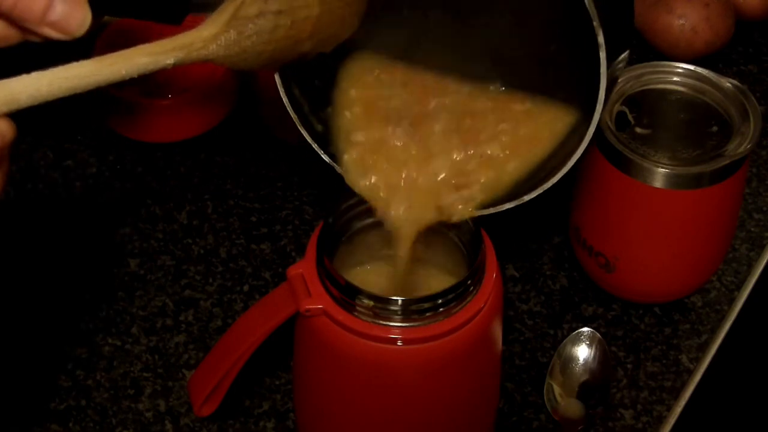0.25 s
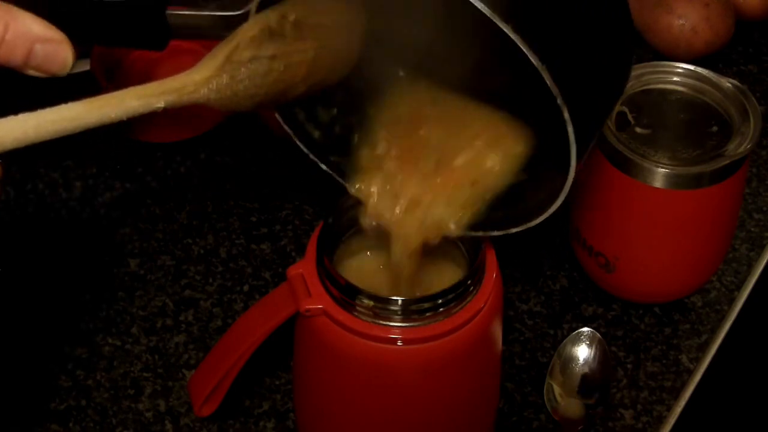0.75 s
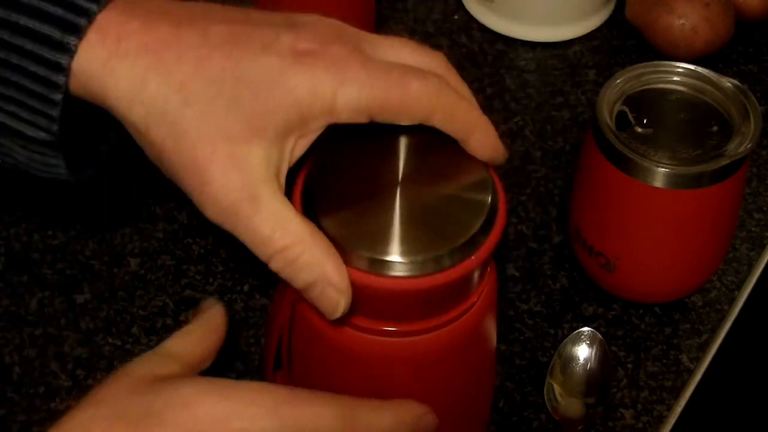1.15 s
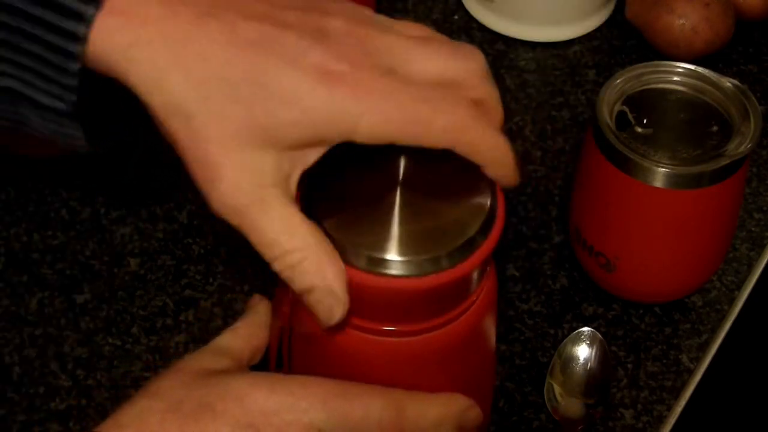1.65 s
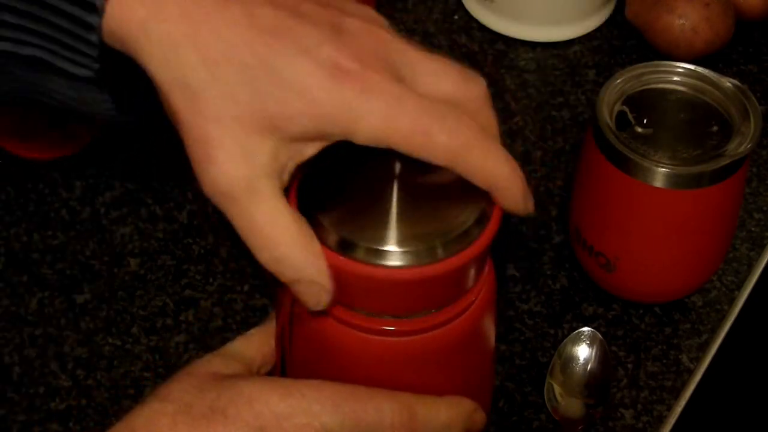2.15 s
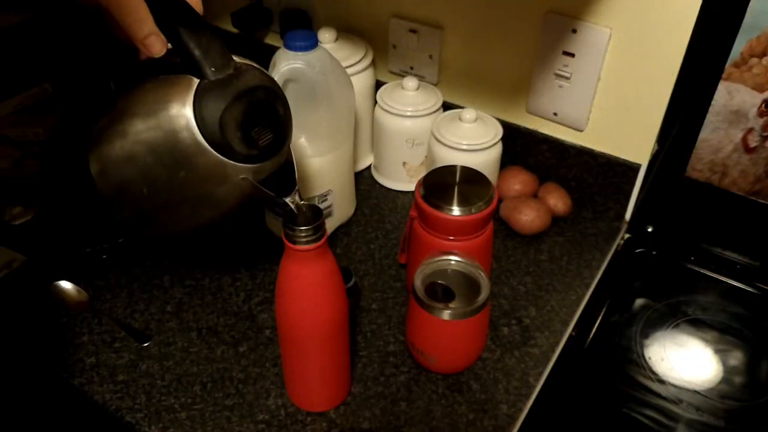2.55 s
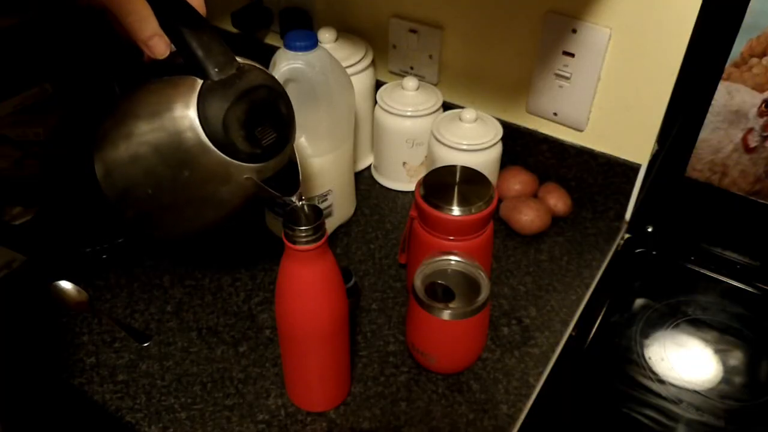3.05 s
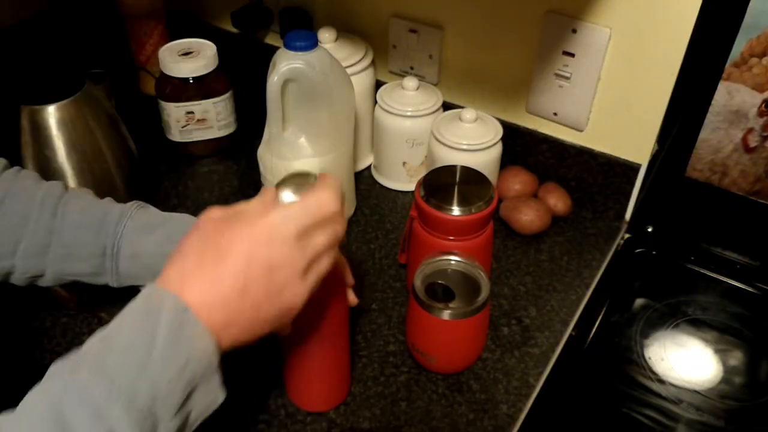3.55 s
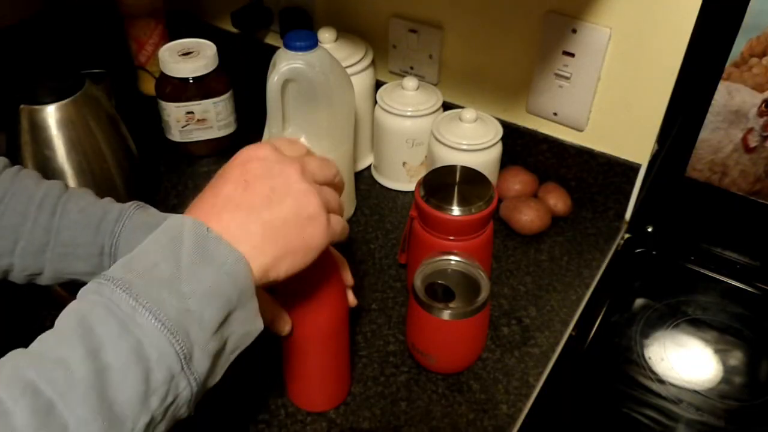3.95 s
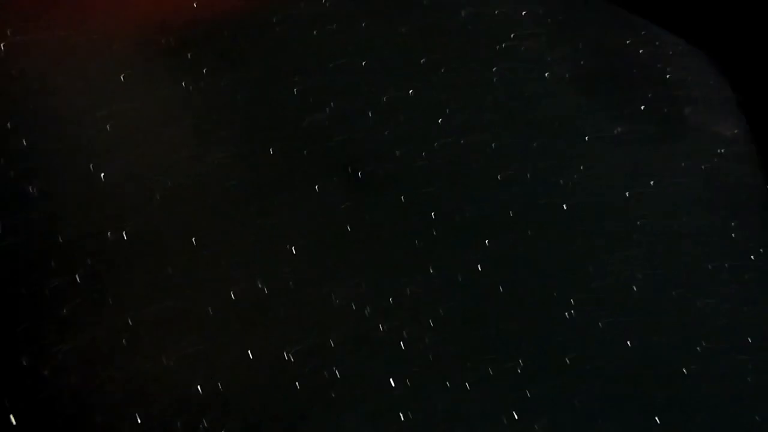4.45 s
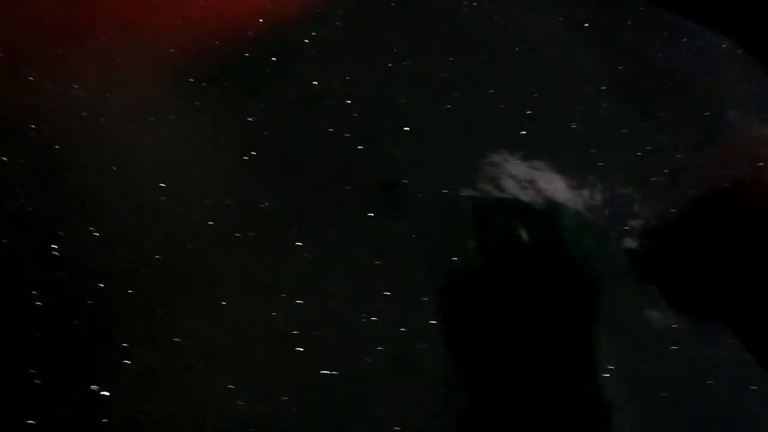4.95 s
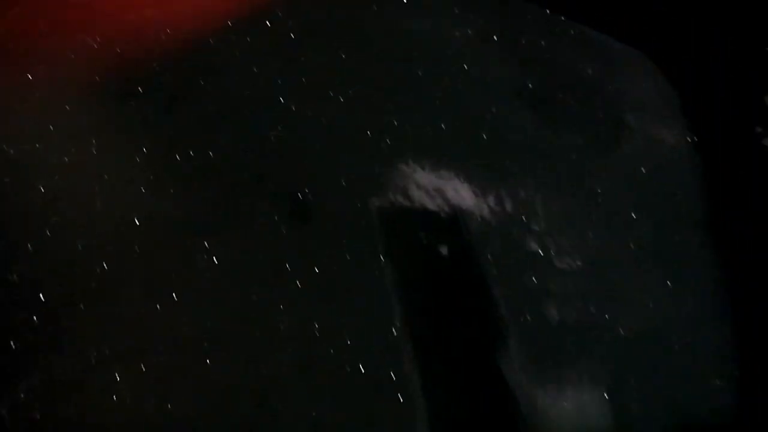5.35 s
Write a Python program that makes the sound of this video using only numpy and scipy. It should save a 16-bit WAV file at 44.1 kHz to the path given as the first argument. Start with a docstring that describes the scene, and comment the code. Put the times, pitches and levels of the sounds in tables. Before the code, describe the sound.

Soup plops softly, a steel flask lid knocks, water trickles and a cap clinks, then an ice scraper rasps a windscreen over an idling engine.

```python
"""A kitchen worktop, close to a stereo microphone. Soup plops into a steel food flask, whose lid is
knocked on and twisted; a kettle trickles into a steel bottle, whose cap clinks home. Each knock
rings the steel and the air inside. Then, abruptly, outdoors beside an idling car: a plastic scraper
lands on the windscreen and rasps the frost off in three strokes, ice crystals breaking under its
chattering blade."""
import sys
import numpy as np
from scipy import signal
from scipy.fft import rfft, irfft
from scipy.io import wavfile
from scipy.ndimage import uniform_filter1d

SR = 44100
rng = np.random.default_rng(int(sys.argv[2]) if len(sys.argv) > 2 else 0)


def unload_wav(signal):
    """Save mono or channel-first audio to the path in sys.argv[1] as 16-bit WAV at rate SR, clipped to [-1, 1]."""
    wavfile.write(
        sys.argv[1],
        SR,
        np.round(np.clip(np.atleast_2d(signal).T, -1, 1) * 32767).astype(np.int16),
    )


N = 247401
T = np.arange(N) / SR
LID_FROM, KETTLE_FROM, CAP_FROM, CAR_FROM = 1.033, 2.367, 3.352, 4.297  # seconds

# How alike the two sides of the microphone sound in each place: frequency_hz, correlation
INDOORS = [(130, 1), (640, .92), (1400, 0.85), (3100, 0.72), (6800, 0.38), (15000, 0.3)]
OUTDOORS = [(300, 0.99), (1400, 0.99), (3100, 0.98), (7000, 0.63), (15000, 0.25)]


def scraper(judder_db=0.72, grit_db=1.5, rasp_gain_db=3.0):
    """Countless ice crystals fracture under the blade while its edge catches and slips."""
    # Three strokes and a light graze (the second row), each a steady drag with one shove on top:
    # start_s, end_s, drag_db, shove_middle_s, shove_half_length_s, shove_db, fizz_from_db, fizz_to_db
    strokes = [(4.283, 4.818, -25, 4.52, 0.15, 6, -7, 2.5), (4.843, 4.915, -47, 4.898, 0.021, 8, -3, -9),
               (4.918, 5.247, -41, 5.124, .16, 21.5, 4.5, -3.5),
               (5.266, 5.605, -28, 5.355, 0.065, 9, -1, 7)]
    # Peaks and dips colouring each stroke; the first has a thin, high hiss near 11 kHz:
    # centre_hz, width_hz, lift_db
    colours = [
        [(2270, 430, -2), (2910, 85, 4), (3300, 150, 1), (4400, 690, -2.5), (7460, 280, 0), (11350, 370, 8.5)],
        [(3050, 300, -3), (4620, 310, 7), (6330, 350, 6)],
        [(1850, 130, -21), (3148, 65, 13), (3980, 200, 7), (4900, 350, 10), (6070, 190, 12.5), (6930, 80, 9.5),
         (7380, 110, 8), (8200, 230, 4), (9700, 520, 5), (12400, 200, -2)],
        [(1910, 31, 10), (2320, 140, 3.5), (2910, 100, 8.5), (3340, 125, 7.5), (4200, 90, 6.5),
         (5070, 140, 6.5), (6760, 160, 1.5), (7850, 330, 2), (11000, 190, 4.5)],
    ]
    frost = sum(rasp(*stroke, colour) for stroke, colour in zip(strokes, colours))
    grain = unit(amp(judder_db * wobble(81) + grit_db * wobble(2600)))
    return grain * (amp(rasp_gain_db) * frost + chatter())


def rasp(start, end, drag_db, shove_s, shove_half_s, shove_db, fizz_from_db, fizz_to_db, colour,
         attack_s=0.031, release_db_per_s=798, sag_per_s=0.054, patchy_db=1.78):
    """One stroke: dense fractures follow the pressure, coloured by wavering peaks and dips."""
    # Breaking frost: frequency_hz, level_db
    frost_spectrum = [(300, -30), (550, -6), (900, -10), (1300, -8), (1700, -5.5), (2550, -6), (3100, -4.5),
                      (3650, -8), (4900, -6.5), (5550, -10), (7300, -4.5), (11600, -13.5), (14300, -17.5),
                      (16000, -27)]
    hz, t, frames = signal.stft(noise(frost_spectrum, OUTDOORS), SR, nperseg=1024, noverlap=768)
    sag = 1 - sag_per_s * (np.clip(t, start, end) - shove_s)  # the colour sinks through the stroke
    for rest_hz, width, lift_db in colour:
        centre = rest_hz * (sag + 0.0059 * np.interp(t, T, wobble(25)))
        flare = 1.02 * (1 + 0.23 * np.interp(t, T, wobble(26)))
        frames *= amp(lift_db * flare / (1 + (2 * (hz[:, None] - centre) / width) ** 2))
    frames *= amp(patchy_db * patches(frames.shape[1:]))  # each crust breaks with its own colour
    treble = 1 / (1 + (6000 / (hz[:, None] + 1)) ** 8)
    coarse, fizz = (signal.istft(frames * share, nperseg=1024, noverlap=768)[1][:, :N]
                    for share in (1 - treble, treble))
    shove = np.exp(-abs((T - shove_s) / shove_half_s) ** 3.55)  # a flat-topped swell
    contact = np.clip((T - start) / attack_s, 0, 1) * amp(-release_db_per_s * np.maximum(T - end, 0))
    fizz_db = np.interp(T, [start, end], [fizz_from_db, fizz_to_db])
    fizz_db -= 3.5 * (1 - shove)  # outside the shove, fewer fine crystals shatter
    return contact * amp(drag_db + shove_db * shove) * (coarse + amp(fizz_db) * fizz)


def chatter(gain_db=-1.5, width_hz=100, jitter=0.014, skirt_db=-8.5):
    """Stick and slip excite the blade's bending note, which glides as the blade travels."""
    # The note's path, one list a full stroke: time_s, pitch_hz, level_db
    glides = [
        [(4.42, 1950, -22), (4.472, 1784, -20), (4.568, 1586, -25.5), (4.576, 1635, -15.5),
         (4.758, 1455, -28.5), (4.764, 1500, -20), (4.84, 1470, -27.5)],
        [(4.95, 1540, -32), (5.056, 1524, -21.5), (5.088, 1560, -31), (5.146, 1820, -20), (5.19, 1850, -28),
         (5.25, 1690, -33)],
        [(5.29, 1800, -34), (5.344, 1816, -19.5), (5.428, 1700, -23), (5.446, 1730, -33), (5.5, 1710, -32.5),
         (5.59, 1480, -27.5), (5.6, 1530, -32)],
    ]
    times, pitch_hz, level_db = np.vstack(glides).T
    hz = np.interp(T, times, pitch_hz) * (1 + jitter * wobble(200))
    note = unit(resonate(resonate(rng.standard_normal(N), hz, width_hz), hz, 3 * width_hz))
    skirt = unit(resonate(resonate(rng.standard_normal(N), hz, 600), hz, 830))  # ragged slips smear it
    touching = sum(between(rows[0][0], rows[-1][0], size=600) for rows in glides)
    return unit(note + amp(skirt_db) * skirt) * amp(gain_db + np.interp(T, times, level_db)) * touching


def landing(start_s=4.2998):
    """The scraper lands with a dull, quickly damped clack; the stiff glass radiates little bass."""
    out, t = np.zeros((2, N)), np.arange(SR // 4) / SR
    # pitch_hz, level_db, t60_s
    modes = [(418, 0.0, 0.013), (227, -17.5, 0.2), (920, -6.5, 0.012), (2660, -12.5, 0.03)]
    clack = sum(amp(db) * dying(t, t60) * np.sin(2 * np.pi * hz * t) for hz, db, t60 in modes)
    clack = signal.sosfilt(signal.butter(2, 140, "high", fs=SR, output="sos"), clack)
    add(out, start_s, np.array([clack, clack]))
    return out


def flask():
    """The lid is set on the food flask and twisted tight; brighter knocks ring the steel more."""
    # Lid knocks: start_s, level_db, then relative to that level: bright_db, hollow_db, thud_db
    knocks = [(1.034, -44.5, -13, 3.5, 3.5), (1.080, -22, .5, 8, -11), (1.117, -25, -9.5, 6.5, -15),
              (1.349, -41, -7.5, -5, -5), (1.400, -43.5, -7, 1, -6.5), (1.619, -43.5, -14.5, 4, -1.5),
              (1.748, -25, -8.5, -23, -8), (1.811, -39.5, -4, -11, -5), (1.865, -37, -6.5, 1.5, -16),
              (1.878, -56.5, 5, 3, -10), (2.204, -40.5, -8, 3.5, -12), (2.234, -47.5, -9, 11, -6),
              (2.263, -38.5, -7.5, 2, -8), (2.280, -44, -4, 3, 0), (2.311, -22.5, 5, -1.5, -5.5)]
    # The flask's ring: pitch_hz, level_db, t60_s
    modes = [(431.5, -4.5, 0.15), (477, -5.5, 0.35), (536.6, -5, 0.18), (578, -5.5, 0.38),
             (1358, -18, 0.15), (1764, -2, 0.21), (1810, -0.5, 0.25), (2450, -10, 0.26),
             (2646, -17.5, 0.17), (3085, -12, 0.34), (3730, -20, 0.25), (4060, -8, 0.11),
             (4320, -10, 0.097), (5150, -20, 0.25), (5450, -26, 0.224), (6380, -23, .29)]
    # The lid's clatter: frequency_hz, level_db
    clatter = [(100, -36), (300, 1.5), (450, 8.5), (700, 1.5), (1000, -0.5), (1300, -3.5), (2100, -6.5),
               (2450, -10.5), (3100, -6.5), (3400, -12.5), (4200, -9), (6500, -13.5), (9000, -15.5),
               (15000, -35.5)]
    out = np.zeros((2, N))
    for start, db, bright_db, hollow_db, thud_db in knocks:
        steel_db = 7 + 1.22 * bright_db
        focus_hz = 1850 * 2 ** (0.05 * max(bright_db, 0))  # the brightest reach higher modes
        add(out, start, knock(modes, clatter, db, bright_db, hollow_db, steel_db, thud_db, focus_hz,
                              rise_s=0.0011, ring_db=-4, clatter_db=-2.5, crack_t60=0.026,
                              room_db=-4.5, thud_t60=0.44, thud_rise_s=0.0089, detune=0.0053))
    return out * between(LID_FROM, KETTLE_FROM, size=200)


def bottle():
    """The cap is pushed onto the steel bottle and clinks as it turns."""
    # Cap knocks; bright, hollow and steel are relative to the level, the strike point sets the focus:
    # start_s, level_db, bright_db, hollow_db, steel_db, contact_s, focus_hz
    knocks = [(3.661, -35.5, -17, -3, -15, .0008, 5700), (3.671, -36.5, -18, 10.5, -26, 0.0042, 2400),
              (3.728, -61.5, 13.5, 9, -2, 0.0043, 5000), (3.818, -49.5, -16, 10, -15, 0.0027, 2400),
              (3.945, -39.5, -4, -2, -0.5, 0.00098, 2400), (4.084, -49.5, -1.5, 1, -10, 0.0088, 4500),
              (4.106, -34.5, -5.5, -12, 7, .003, 4970), (4.225, -49, -8, 0, 3, 0.0039, 4530)]
    # The bottle's ring: pitch_hz, level_db, t60_s
    modes = [(463, 6, 0.32), (756, -5.5, 0.41), (900, -15, .26), (1125, -29, 0.22), (2405, -0.5, 0.34),
             (2764, -18, 0.14), (3470, -3, 0.11), (3580, 4, 0.23), (4560, -11, 0.22), (5650, -6, 0.23),
             (6100, -15, 0.28), (6500, -15, .2), (8170, -9, 0.22)]
    # The cap's clatter: frequency_hz, level_db
    clatter = [(100, -22), (350, 6), (550, -1), (750, 6), (950, 0.5), (1250, -0.5), (1850, -15),
               (2500, -16), (4000, -17), (5700, -14.5), (9000, -28.5), (14000, -38)]
    out = np.zeros((2, N))
    for start, db, bright_db, hollow_db, steel_db, contact_s, focus_hz in knocks:
        thud_db = -14 + 20 * np.log10(contact_s / 0.001)  # a longer contact shakes the worktop more
        add(out, start, knock(modes, clatter, db, bright_db, hollow_db, steel_db, thud_db, focus_hz,
                              rise_s=contact_s, ring_db=-2, clatter_db=2, crack_t60=0.061,
                              room_db=1, thud_t60=0.4, thud_rise_s=0.0073, detune=0.00091))
    return out * between(CAP_FROM, CAR_FROM)


def knock(modes, clatter, db, bright_db, hollow_db, steel_db, thud_db, focus_hz,
          rise_s, ring_db, clatter_db, crack_t60, room_db, thud_t60, thud_rise_s, detune,
          room_t60=0.41, wall_from_hz=1200):
    """One blow cracks, sounds the hollow, rings the steel, thuds the worktop and fades in the room."""
    # The worktop's thud: frequency_hz, level_db
    worktop = [(30, -47), (70, -22), (110, -13), (170, 5), (220, -2.5), (330, -13), (700, -60.5)]
    t = np.arange(SR) / SR
    walls = [(hz, 70, 8) for hz, _, _ in modes if hz > wall_from_hz]  # centre_hz, width_hz, lift_db
    crack = noise(clatter, INDOORS, SR, walls)
    crack *= dying(t, crack_t60) + amp(room_db) * dying(t, room_t60)
    low, high = (signal.butter(4, 2200, kind, fs=SR, output="sos") for kind in ("low", "high"))
    blow = crest(signal.sosfilt(low, crack)) + amp(bright_db) * crest(signal.sosfilt(high, crack))
    ring = 0
    for hz, mode_db, t60 in modes:  # the low modes belong to the air inside, the high ones to the wall
        wall_db = steel_db - 9 * min(abs(np.log2(hz / focus_hz)), 1)
        drive_db = hollow_db if hz < wall_from_hz else wall_db
        turns = hz * (1 + detune * rng.standard_normal()) * t + rng.random()  # the grip detunes it
        twin = turns + 0.0123 * hz * rng.uniform(0.48, 1.95) * t  # a close twin makes it beat
        pair = 0.59 * np.sin(2 * np.pi * turns) + 0.29 * np.sin(2 * np.pi * twin)
        ring += amp(drive_db + mode_db) * dying(t, t60) * pair
    vessel = (amp(clatter_db) * blow + amp(ring_db) * ring) * (1 - np.exp(-t / rise_s))
    thud = noise(worktop, INDOORS, SR) * dying(t, thud_t60) * (1 - np.exp(-t / thud_rise_s))
    return amp(db) * vessel + amp(db + thud_db) * crest(thud)


def pouring(plop_gain_db=-6, spatter_gain_db=-2, bubble_gain_db=-4):
    """Lumps of soup and drops of water land in the hollow vessel with a fine spatter."""
    # The main wet landings: start_s, plop_db, spatter_db, bubble_hz
    plops = [(0.001, -39, -76, 2220), (0.074, -53.5, -59, 2220), (0.147, -53.5, -63, 2590),
             (0.206, -49, -56.5, 2620), (0.243, -48.5, -60, 2040), (0.279, -51, -54, 2030),
             (0.403, -52, -52, 2210), (0.645, -52, -56, 2020), (0.713, -53, -67, 2200),
             (0.781, -51, -49, 3260), (0.932, -53.5, -56.5, 2030), (2.449, -37.5, -56.5, 1867),
             (2.506, -49, -58.5, 1900), (2.637, -43.5, -62, 1900), (2.668, -47, -57, 1910),
             (2.733, -47, -68, 2000), (2.861, -54.5, -51, 3150), (3.145, -53, -69, 1970)]
    # Brief sprays of hiss: start_s, level_db, length_s
    sprays = [(0.096, -65, 0.051), (0.671, -64, .04), (2.362, -55, 0.062), (2.847, -57.5, 0.057),
              (3.329, -55, 0.031)]
    # The colour of a plop and of its spatter: frequency_hz, level_db
    plop_spectrum = [(150, -32), (450, -4), (850, -0.5), (1400, -6), (2100, -2.5), (3200, -17), (6000, -33)]
    spatter_spectrum = [(1500, -25), (3500, -3.5), (7000, -3.5), (10500, 2.5), (16000, -8.5)]
    # Resonances of the air in the vessel: centre_hz, width_hz, lift_db
    hollow = [(956, 120, 8), (2040, 270, 5.5), (2610, 230, 4), (3260, 120, 2)]
    out, t = np.zeros((2, N)), np.arange(SR // 2) / SR
    room = amp(-15) * dying(t, t60=0.27)
    landings = list(plops) + drips(0, LID_FROM) + drips(KETTLE_FROM, CAP_FROM)
    for start, plop_db, spatter_db, hz in landings:
        plop = noise(plop_spectrum, INDOORS, len(t), hollow) * (dying(t, t60=0.097) + room)
        spatter = noise(spatter_spectrum, INDOORS, len(t)) * (dying(t, t60=0.026) + room)
        bubble_hz = hz * (1 + 1.8 * t)  # a trapped bubble rings and rises
        bubble = dying(t, t60=0.047) * np.sin(2 * np.pi * np.cumsum(bubble_hz) / SR)
        add(out, start, amp(plop_db + bubble_gain_db) * np.array([bubble, bubble]))
        add(out, start, amp(plop_db + plop_gain_db) * crest(plop))
        add(out, start, amp(spatter_db + spatter_gain_db) * crest(spatter))
    for start, db, length_s in sprays:
        count = int(length_s * SR)
        add(out, start, amp(db) * noise(spatter_spectrum, INDOORS, count) * np.hanning(count))
    return out


def drips(start, end, per_s=3, plop_db=-59.5, spatter_db=-68, middle_hz=2100):
    """Faint drips fall at random moments; returns rows like those of the plops."""
    chance = rng.random((round(per_s * (end - start)), 2))
    return [(start + when * (end - start), plop_db, spatter_db, middle_hz * 2 ** (pitch - 0.5))
            for when, pitch in chance]


def engine(firing_hz=28.35, throb=0.21, rumble_db=-27):
    """The car idles nearby: a rumble that swells with each firing, over steady orders."""
    # The rumble: frequency_hz, level_db
    rumble_spectrum = [(30, -42), (70, -19), (125, -0.5), (190, 0.5), (330, -3), (500, -9), (850, -16),
                       (1300, -14.5), (2200, -21.5), (5000, -41), (15000, -59)]
    # Engine orders: firing_multiple, rms_db
    orders = [(1, -65), (2, -50.5), (6, -41), (7, -41.5), (8, -40), (11, -36), (11.5, -45), (12.5, -44),
              (15, -57), (16.5, -43)]
    firings = firing_hz * (T - CAR_FROM) + 0.0094 * wobble(3.6)
    swell = 1 + throb * np.cos(2 * np.pi * firings)
    rumble = amp(rumble_db) * noise(rumble_spectrum, OUTDOORS) * swell
    hum = sum(amp(db) * np.sqrt(2) * np.sin(2 * np.pi * (order * firings + rng.random()))
              for order, db in orders)
    return rumble + hum


def kitchen():
    """Room tone, with the soft slither of soup and the kettle's gurgling trickle."""
    # The room while soup pours, while water pours and between pours: frequency_hz, level_db
    soup_room = [(24, -81), (40, -29), (311, -12), (371, -8.5), (513, -8.5), (825, -2.5), (1140, -12),
                 (2030, -11.5), (2740, -13.5), (10100, -22), (15800, -20)]
    kettle_room = [(40, -29), (150, -8), (300, -3.5), (480, -1), (650, -3.5), (950, -7), (1500, -10),
                   (2000, -5), (2700, -10), (4400, -16), (9000, -18.5), (15800, -21.5)]
    still_room = [(30, -20), (70, -12), (150, -14.5), (300, -13.5), (500, -18), (900, -20.5), (1900, -25),
                  (5000, -29.5), (15800, -31.5)]
    soup = noise(soup_room, INDOORS) * amp(-64 + 1.2 * wobble(30)) * between(0, LID_FROM)
    trickle = noise(kettle_room, INDOORS) * amp(-61 + wobble(40)) * between(KETTLE_FROM, CAP_FROM)
    still_gain = amp(-63) * between(LID_FROM, KETTLE_FROM) + amp(-62.5) * between(CAP_FROM, CAR_FROM)
    return soup + trickle + still_gain * noise(still_room, INDOORS)


def noise(spectrum, likeness, count=N, peaks=()):
    """Stereo noise of rms 1 with a given spectrum, lifted at its resonances."""
    hz = np.fft.rfftfreq(count, 1 / SR)
    mid, side = rfft(rng.standard_normal((2, count)))
    same = np.clip(read(likeness, hz), -1, 1)
    mid, side = mid * np.sqrt(1 + same), side * np.sqrt(1 - same)
    lift_db = sum(db / (1 + (2 * (hz - centre) / width) ** 2) for centre, width, db in peaks)
    return unit(irfft(np.array([mid + side, mid - side]) * amp(read(spectrum, hz) + lift_db), count))


def wobble(rate_hz):
    """Random motion of rms 1, rolling off above the rate."""
    hz = np.fft.rfftfreq(N, 1 / SR)
    return unit(irfft(rfft(rng.standard_normal(N)) * np.exp(-(hz / rate_hz) ** 2), N))


def patches(shape, frames=4, bins=7):
    """Random field of rms 1: short-lived patches a few hundred Hz wide."""
    return unit(uniform_filter1d(uniform_filter1d(rng.standard_normal(shape), frames, 1), bins, 0))


def resonate(x, hz, width_hz):
    """A resonance of gain 1 that follows the curve hz."""
    turn = np.exp(2j * np.pi * np.cumsum(hz) / SR)
    pole = np.exp(-np.pi * width_hz / SR)
    return 2 * (turn * signal.lfilter([1 - pole], [1, -pole], x / turn)).real


def dying(t, t60):
    """Falls by 60 dB in t60 seconds."""
    return np.exp(-np.log(1000) * t / t60)


def between(start, end, size=64):
    """1 from start to end, 0 elsewhere, with ramps of size samples."""
    return uniform_filter1d(1. * ((T >= start) & (T < end)), size)


def amp(db):
    """Decibels to gain."""
    return 10 ** (np.asarray(db) / 20)


def unit(x):
    """Scales to rms 1."""
    return x / np.sqrt(np.mean(x ** 2) + 1e-20)


def crest(x, size=220):
    """Scales so that the loudest few milliseconds have rms 1."""
    return x / np.sqrt(uniform_filter1d(x.mean(0) ** 2, size).max() + 1e-20)


def read(points, hz):
    """Reads a table on a log-frequency axis."""
    point_hz, value = np.transpose(points)
    return np.interp(np.log(hz + 1), np.log(point_hz + 1), value)


def add(mix, start_s, sound):
    """Mixes a stereo sound in at start_s."""
    part = mix[:, max(round(start_s * SR), 0):][:, :sound.shape[1]]
    part += sound[:, :part.shape[1]]


def scene(lag_s=2.9e-5):
    """The kitchen, then the car; outdoor sound reaches the right microphone port first."""
    left, right = (engine() + scraper()) * between(CAR_FROM, np.inf) + landing()
    delay = np.exp(-2j * np.pi * np.fft.rfftfreq(N, 1 / SR) * lag_s)
    car = np.array([irfft(rfft(left) * delay, N), right])
    return kitchen() + pouring() + flask() + bottle() + car


def record(dry, cutoff_hz=15950):
    """The microphone: its right port is a little louder and brighter, and the top treble is cut."""
    # Balance of the ports: frequency_hz, left_minus_right_db
    balance = [(100, -1), (700, -0.7), (1300, -1), (2400, -1), (4400, -2.5), (8000, -3.5), (15000, -2)]
    tilt_db = read(balance, np.fft.rfftfreq(N, 1 / SR)) / 2
    heard = irfft(rfft(dry) * amp([tilt_db, -tilt_db]), N)
    lowpass = signal.firwin(511, cutoff_hz, window=("kaiser", 9), fs=SR)
    return signal.oaconvolve(heard, lowpass[None], "same")


dry = scene()
out = record(dry)
unload_wav(out)
```